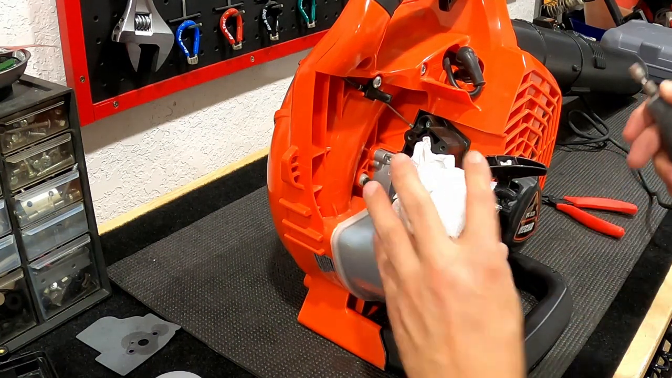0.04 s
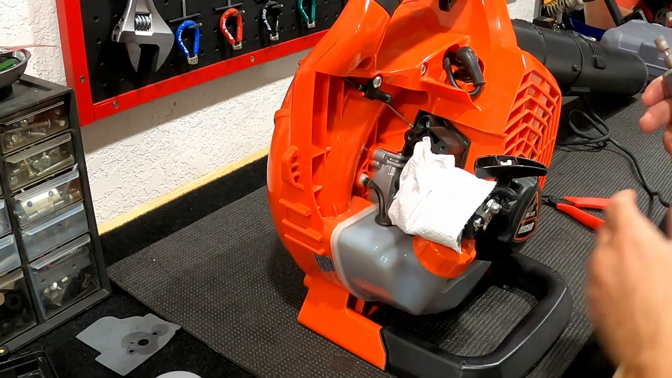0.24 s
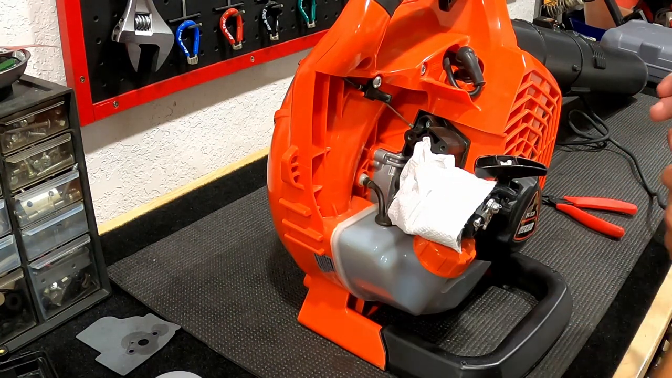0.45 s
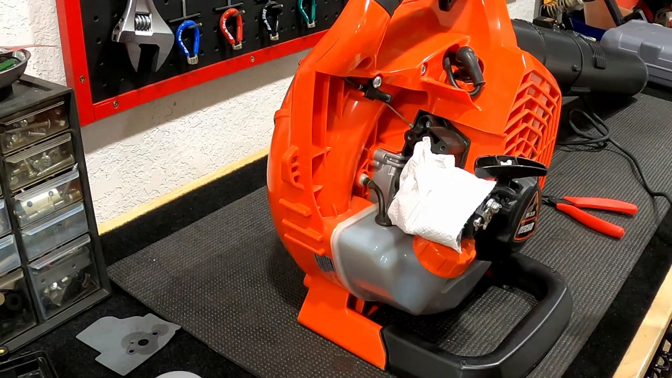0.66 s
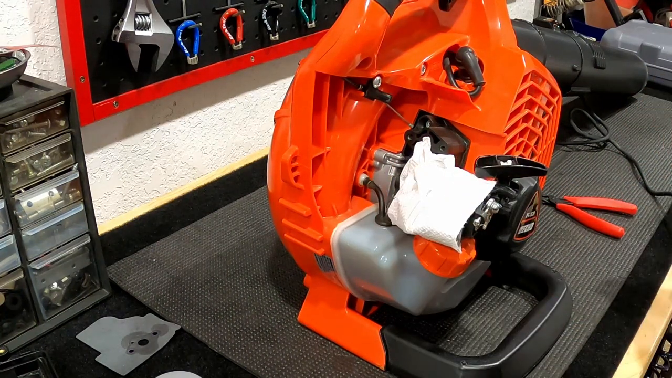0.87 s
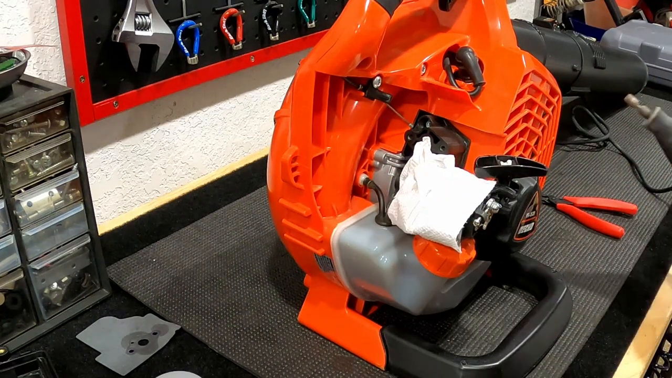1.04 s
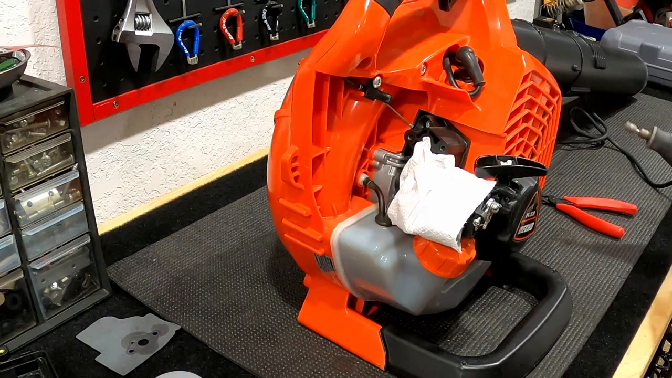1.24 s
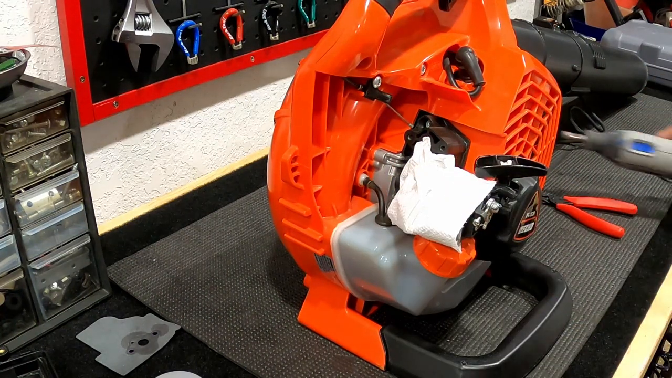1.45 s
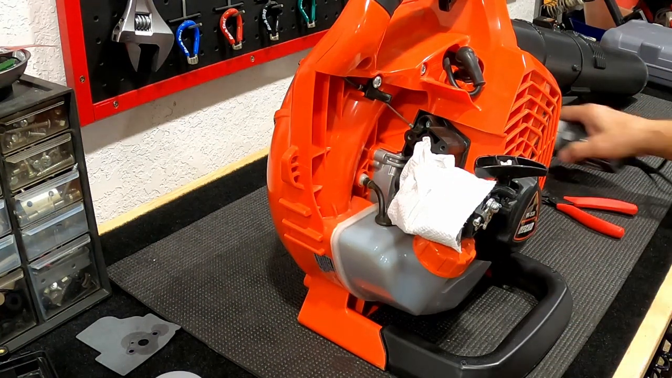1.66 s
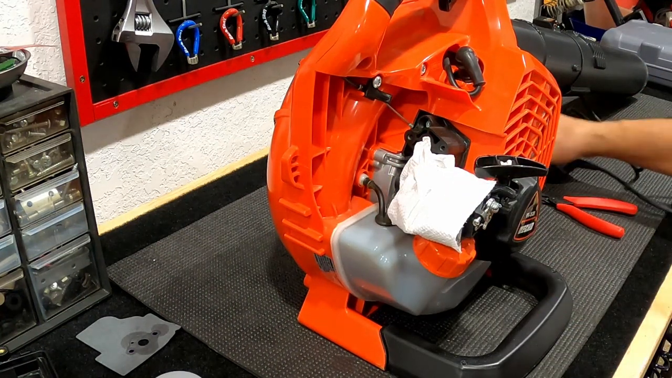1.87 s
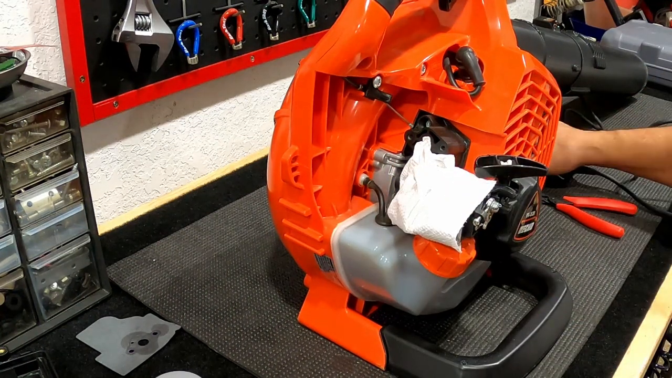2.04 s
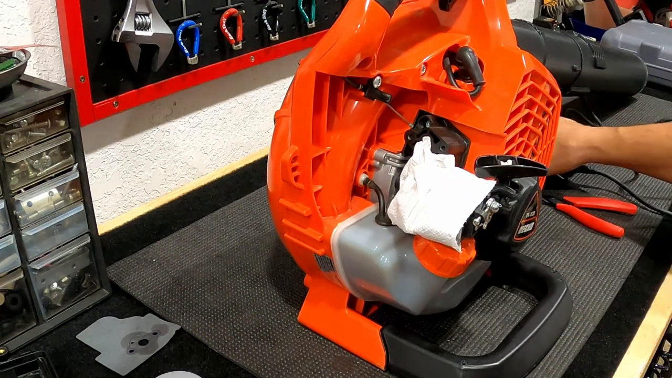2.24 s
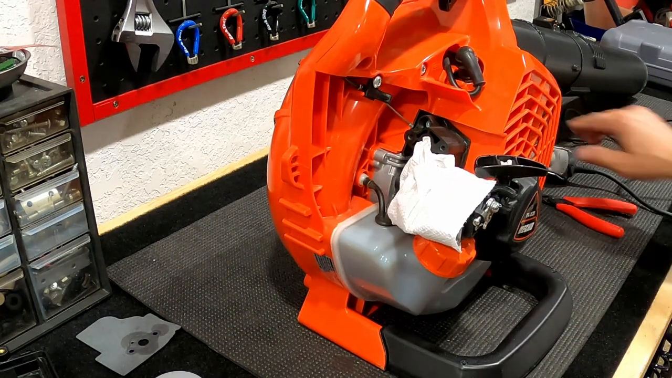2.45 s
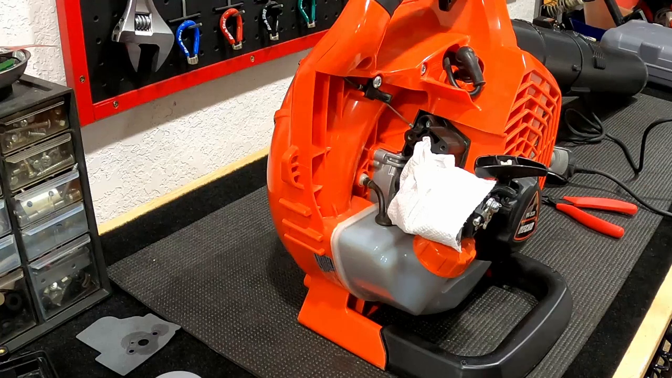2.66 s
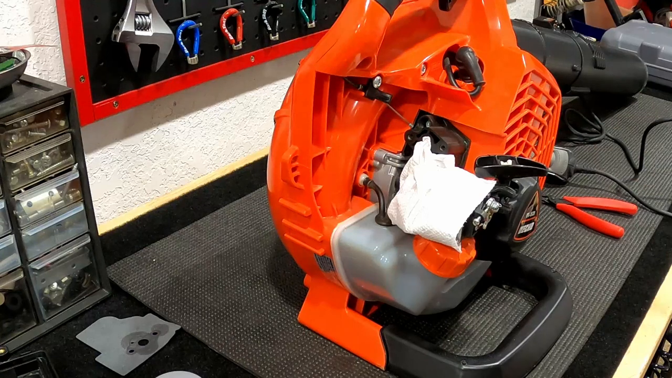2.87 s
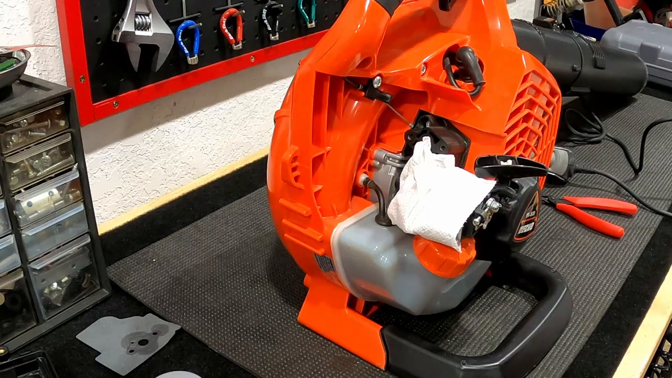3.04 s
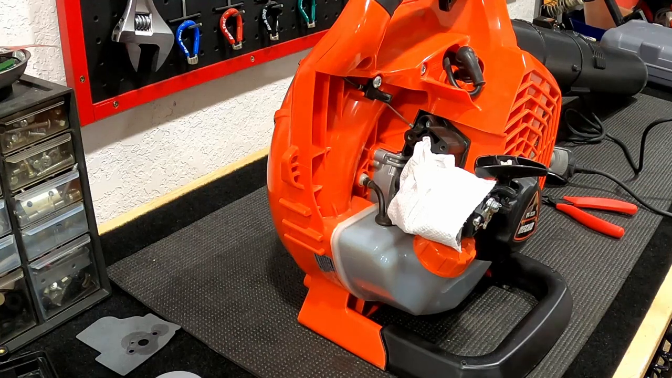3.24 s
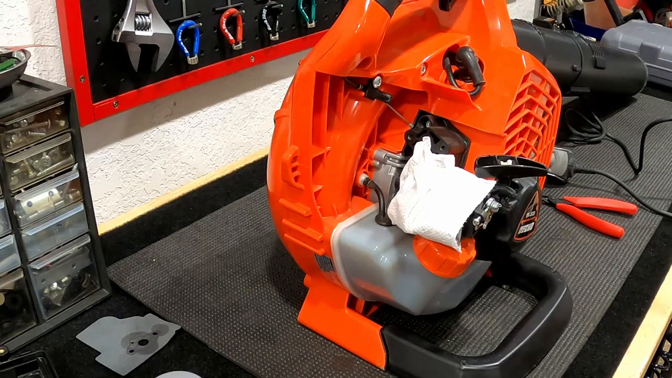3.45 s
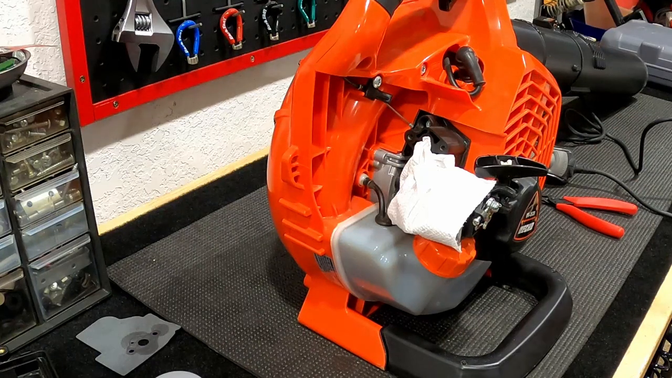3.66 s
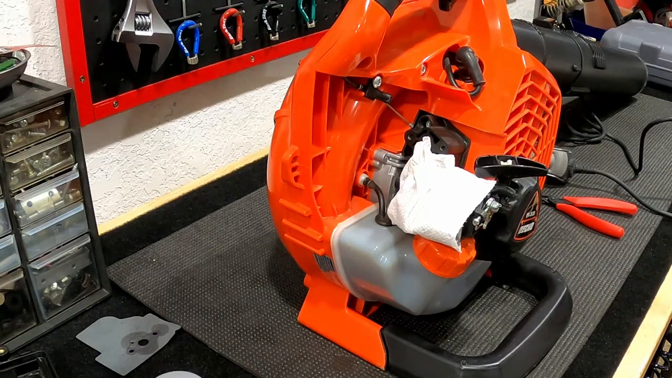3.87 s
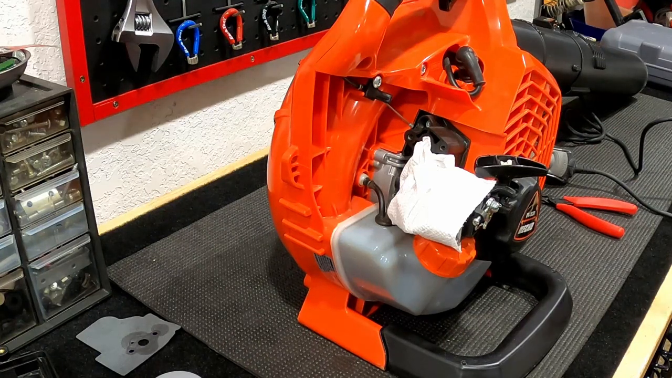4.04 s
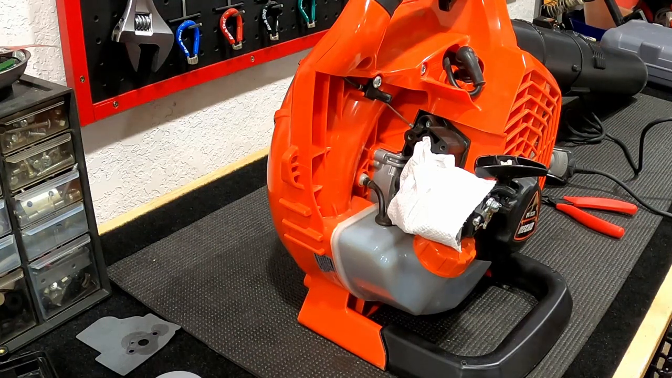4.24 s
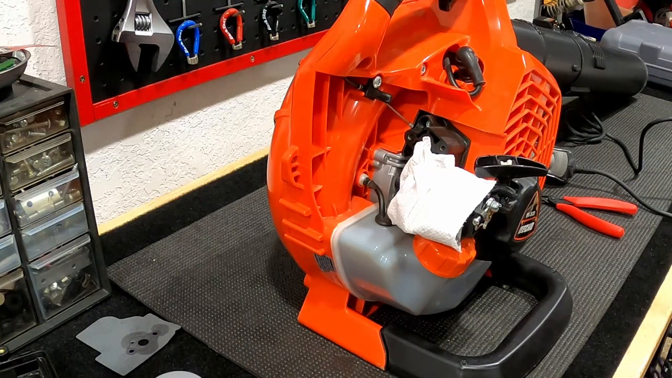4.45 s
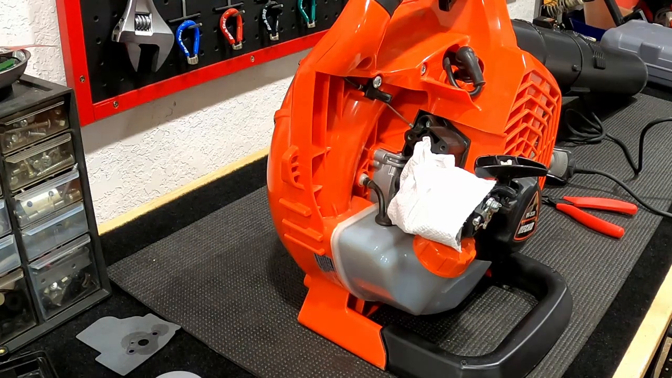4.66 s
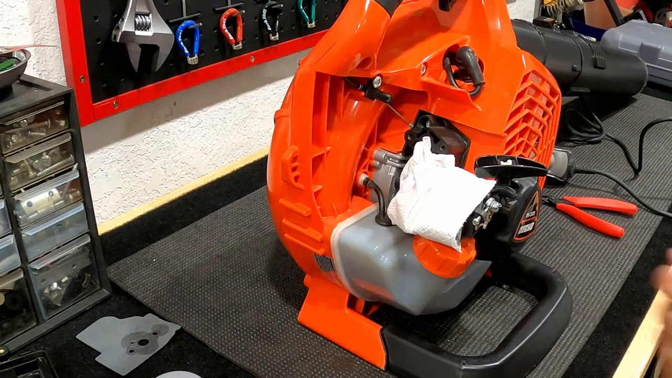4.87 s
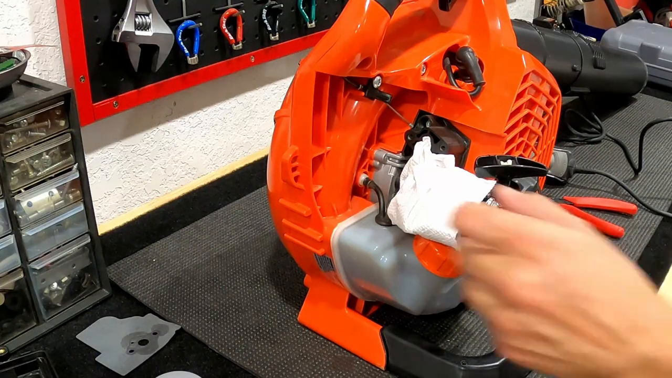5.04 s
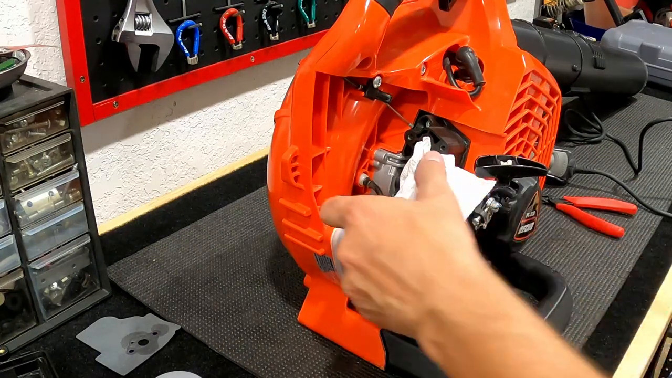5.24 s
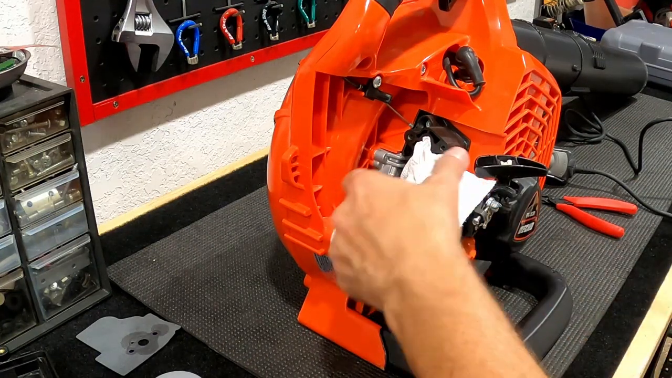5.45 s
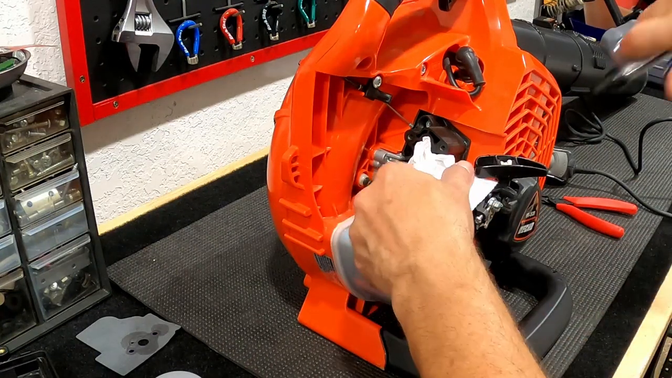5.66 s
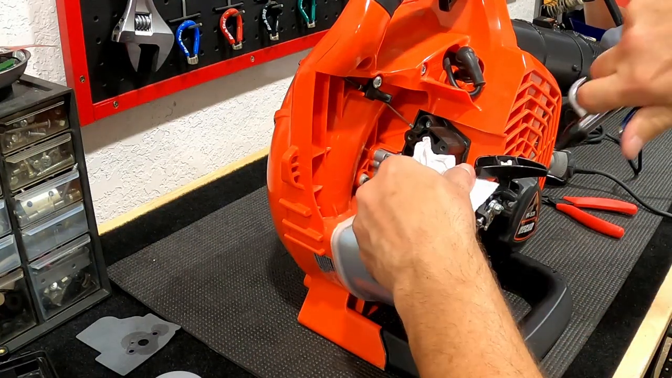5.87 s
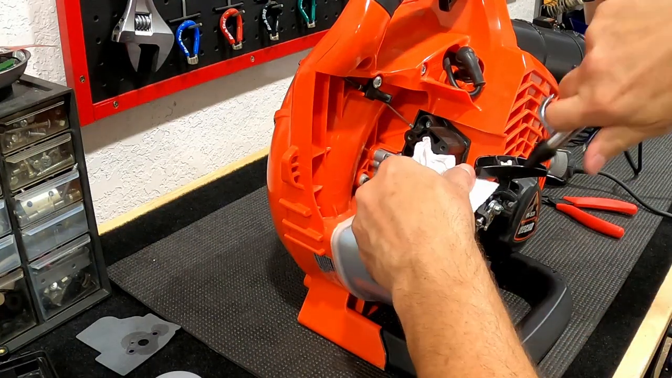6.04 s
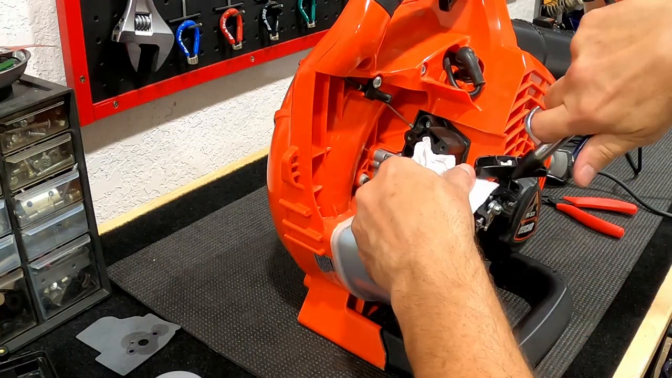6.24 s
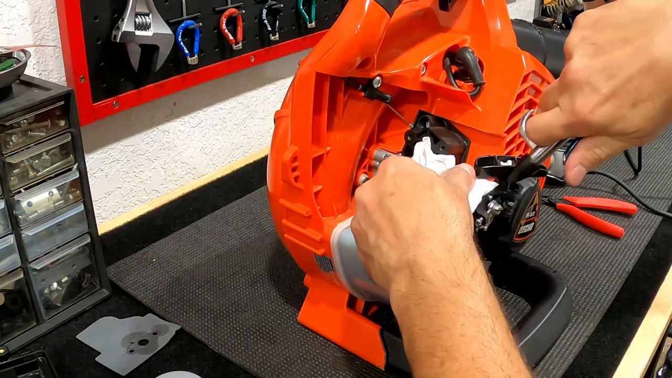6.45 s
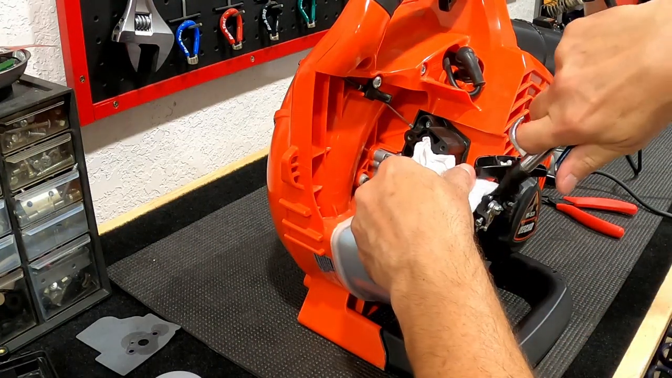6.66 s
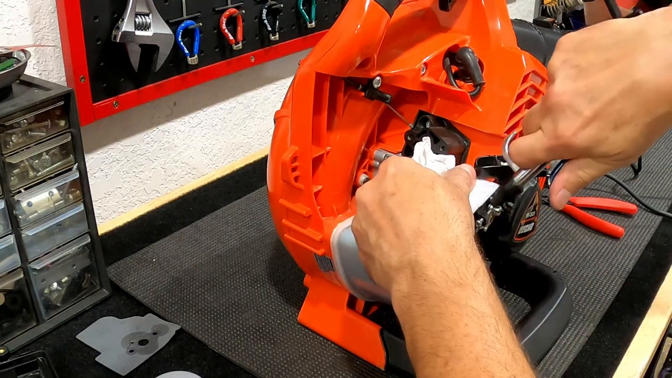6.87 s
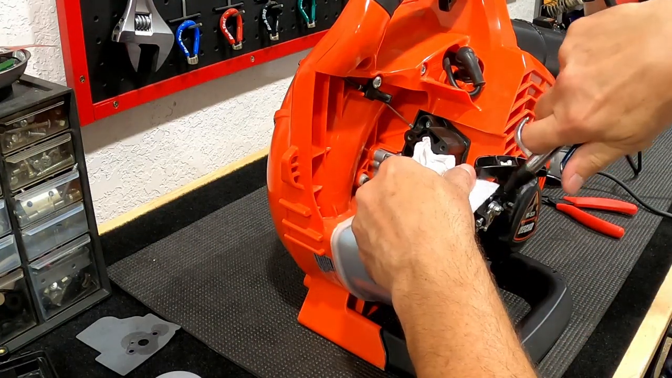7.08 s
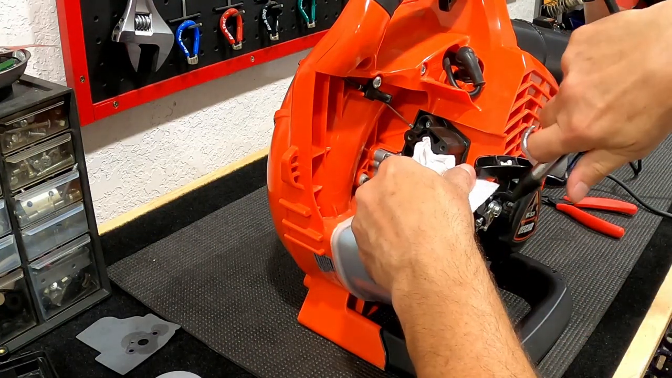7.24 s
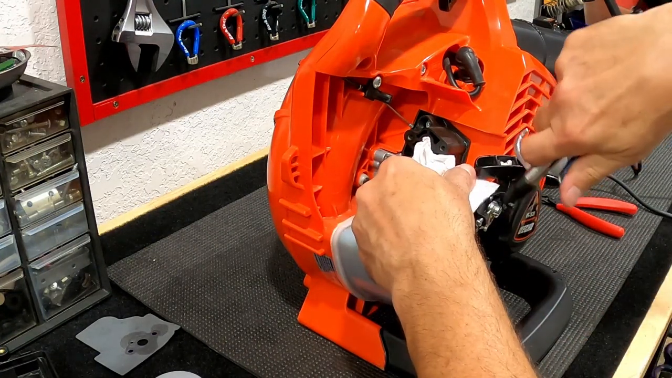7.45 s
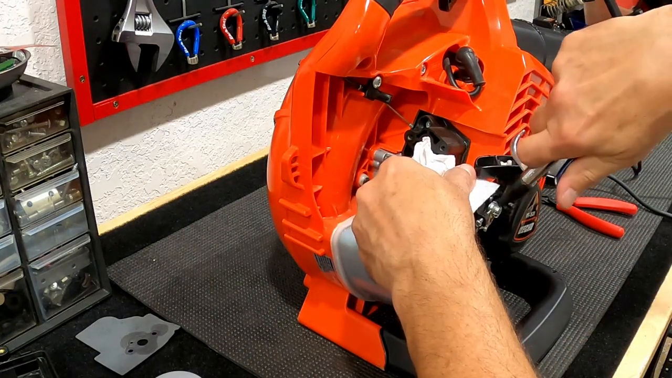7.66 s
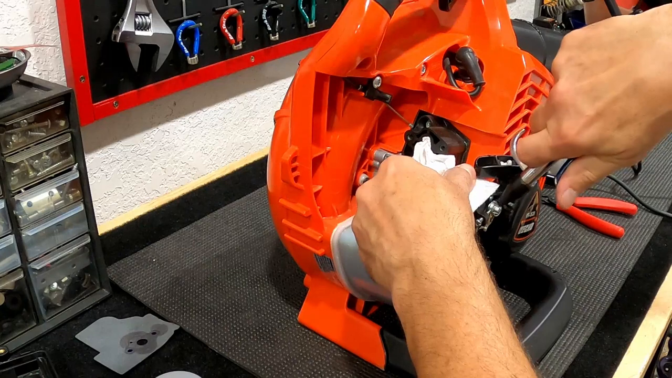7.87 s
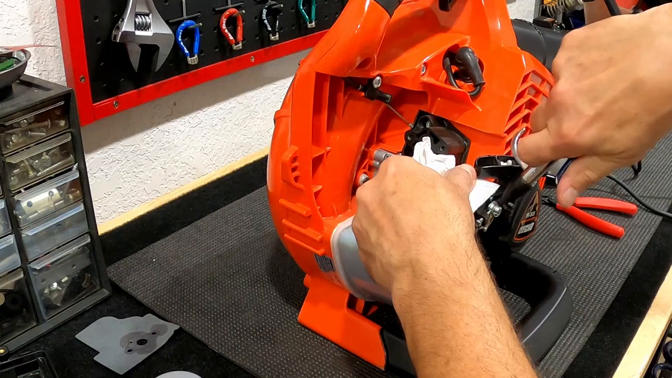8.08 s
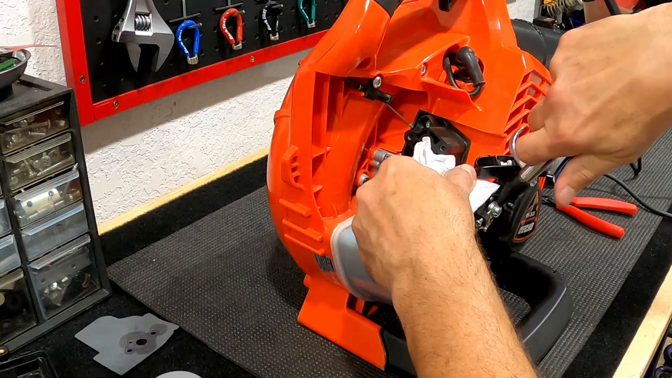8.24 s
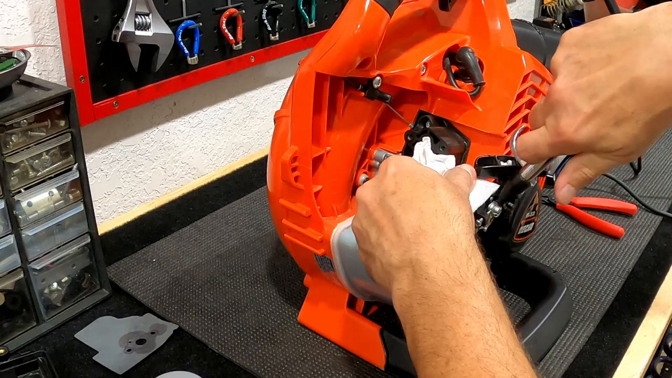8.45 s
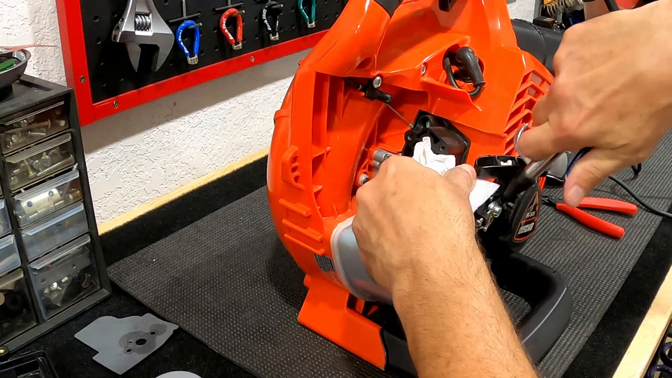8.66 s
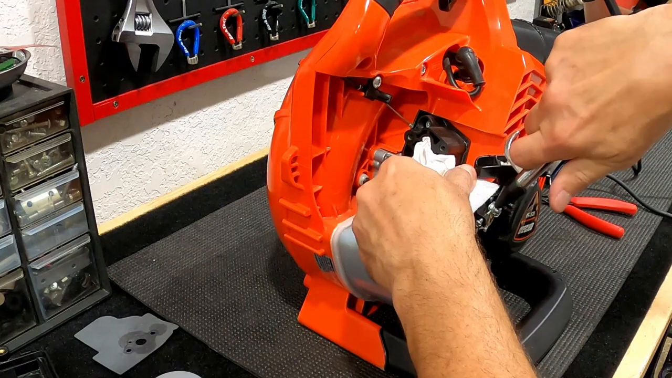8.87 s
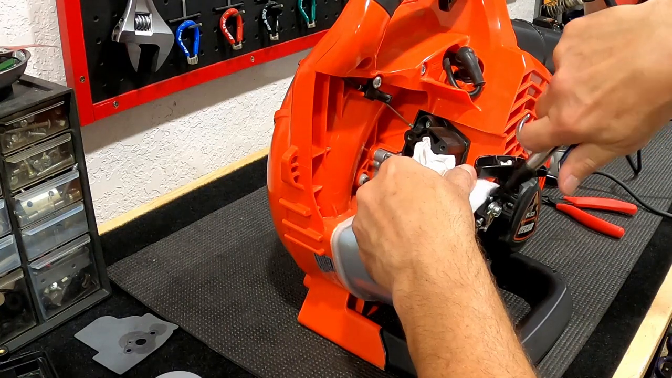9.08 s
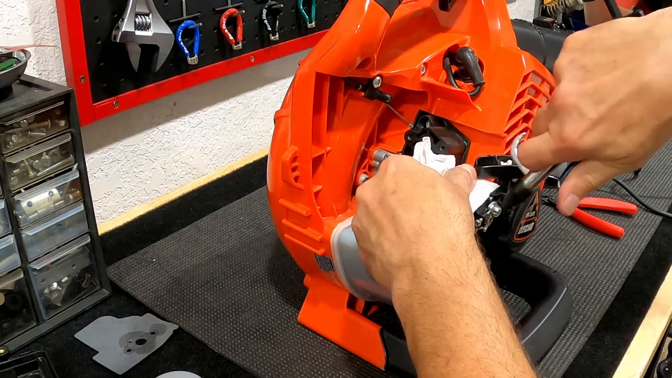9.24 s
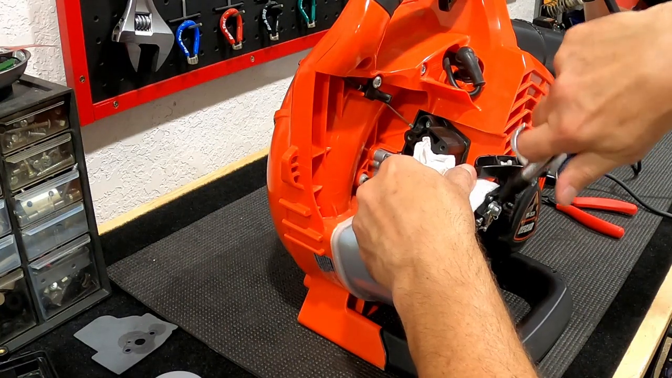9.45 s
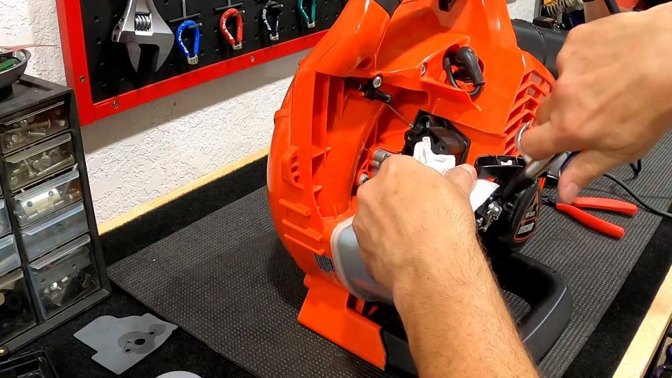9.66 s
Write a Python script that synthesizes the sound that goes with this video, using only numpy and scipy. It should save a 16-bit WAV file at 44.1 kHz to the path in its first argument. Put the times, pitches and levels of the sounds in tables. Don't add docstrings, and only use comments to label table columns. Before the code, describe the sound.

A rotary tool whines at high speed close by, buzzy and bright, swaying in level as it is moved. At about 0.8 s a faint click cuts the power, and the whine glides steadily downward with brushes and fan rushing; dull thumps at 1.8-2.05 s mark it being laid down. It grows faint from 2.6 s and stops near 3.5 s. A small knock follows at 3.6 s, then a sharp, dense clatter of metal parts on a far shelf at 4.1-4.3 s, ringing briefly in the room. Soft hose scrapes continue, with a bump and coupling rattle around 5.8-6 s. Compressed air blasts at 6.17-6.3 s, bright and spitting, then a long pull from 6.45 to 8.64 s, rough and fluttering over fins, with low gusts and breathy whistles. After a short gap, another hiss runs from 8.87 s to the end, now nearly mono.

```python
import sys
import numpy as np
from scipy import signal
from scipy.fft import rfft, irfft, next_fast_len
from scipy.io import wavfile
from scipy.ndimage import uniform_filter1d, map_coordinates

SR = 44100
rng = np.random.default_rng(int(sys.argv[2]) if len(sys.argv) > 2 else 0)


def gain_from_db(level_db):
    decades = np.asarray(level_db, float) / 20
    return 10 ** decades


def to_wav(sig):
    pcm = np.clip(np.atleast_2d(sig), -1, 1) * 32767
    pcm = np.round(pcm).astype(np.int16)
    wavfile.write(sys.argv[1], SR, pcm.T)


N = 428211

# [multiple of shaft speed, level/dB, flicker/dB]
ORDERS = [(1, 27, 1), (3, -1, 2), (4, -13, 4), (6, -9, 4), (6.9, -3, 5), (8, -8, 5), (9.1, -1, 5),
          (10, -10, 4), (10.9, 4, 3), (12.8, -10, 5), (13.2, -4, 6), (15, -6, 6), (16, -5, 4),
          (17.1, -11, 6), (19.1, -8, 7), (21, -7, 6), (23, -12, 5), (25, -10, 5), (26.8, -13, 5),
          (29, -13, 5), (30, -13, 5), (31, -13, 5), (33, -12, 5), (37, -14, 5), (41, -14, 5), (47, -13, 5),
          (73, -9, 5), (79, -8, 5), (83, -8, 5), (32, -3, 4), (40, -5, 4), (48, -1, 4), (52, -12, 5),
          (55, -10, 5), (56, -3, 4), (63, -9, 5), (64, 0, 4), (71, -8, 5), (72, -3, 4), (80, -1, 4),
          (87, -7, 5), (88, 0, 5), (96, -2, 5), (104, 0, 5), (112, -2, 5), (120, -2, 5)]
# [multiple of shaft speed, ripple beats, level facing away/dB, level turned round/dB]
POWERED_TONES = [(8, 0, -35, -34), (8, 1, -38, -34), (8, 2, -47, -50), (8, 3, -40, -42), (8, 4, -50, -46),
                 (8, -1, -43, -47), (8, -2, -55, -52), (5, 2, -50, -48), (10, 0, -37, -46),
                 (10, 2, -48, -48), (13, 0, -50, -46), (15, 0, -43, -53), (16, 0, -54, -50),
                 (4.88, 0, -46, -42)]
# [multiple of shaft speed, level at free speed/dB,
# loss per tenfold slowing/dB, unsteadiness/1]
LEADING_TONES = [
    (5, -31, 21, 1.4),
    (12, -37, 42, 1.3),
    (24, -35, 48, 1.3),
]
# [f/Hz, level/dB]
SHELL_COLOUR = [(200, -50), (255, -34), (295, -25), (500, -20), (650, -19), (780, -15), (900, 3),
                (1150, -10), (1300, -6), (1500, 1), (1800, -8), (2050, -5), (2300, -12), (2600, -4),
                (2800, 5), (3020, -2), (3300, -7), (3550, -4), (3900, -2), (4350, -3), (4700, -8),
                (5400, -2), (6300, -11), (7200, -9), (7900, -12), (9000, -16), (14000, -26)]
# [f/Hz, level/dB]
BRUSH_COLOUR = [(120, -50), (250, -50), (550, -22.5), (734, -26), (929, -3), (1170, -9), (1490, -3),
                (2210, -11.5), (2900, -7.5), (5260, -10), (12300, -18.5), (15000, -36)]
# [f/Hz, level/dB]
FAN_COLOUR = [(150, -63), (300, -21.5), (600, -21), (900, -15.5), (1500, -5), (2000, -6.5), (2800, -3.5),
              (4000, -7.5), (5850, -11), (7960, -30), (15000, -36)]
# [t/s, level/dB]
TOOL_NEARNESS = [(0, 5), (.25, -1.5), (.45, 2), (.62, 5), (.84, 6), (.865, -2.5), (.95, 2.5), (1.1, 2.5),
                 (1.35, 2), (1.5, 3), (1.75, 2), (2.0, 5.5), (2.6, 4), (3.3, -19)]
# [t/s, left minus right/dB]
TOOL_PAN = [(0, -4.5), (.8, -2), (1.5, -1.5), (9.7, 1)]
# [f/Hz, level/dB]
HUM_TONES = [(53.8, -59), (161.5, -63), (240.2, -50.5), (355, -68), (2972, -83), (3973, -83), (4420, -84),
             (5297, -82)]
# [f/Hz, level/dB]
FLOOR_COLOUR = [(12, -50), (22, -12), (58, -3.5), (170, -9), (240, -17), (350, -13.5), (508, -24.5),
                (1560, -36.5), (5360, -34.5), (9000, -45.5), (14000, -91)]
# [t/s, peak level/dB, click over thud/dB]
THUDS = [
    (0.788, -48, 6),
    (1.811, -22.5, -26),
    (1.998, -19.5, -17),
    (2.039, -23, -10),
    (5.801, -26.5, -10),
]
# [t/s, peak level/dB]
PUSHES = [(1.81, -40), (2.021, -26), (3.63, -41), (5.831, -33), (7.337, -22)]
# [t/s, peak level/dB, bright part over dull/dB]
KNOCKS = [(3.619, -37, -15), (3.929, -47.5, -21), (4.013, -38.5, -9), (4.048, -40, -5), (5.038, -50, -10),
          (5.074, -60, -14), (5.493, -49, -26), (5.66, -46, -16), (5.836, -44, -24)]
# [peak t/s, rise/s, time to fade 60 dB/s, level/dB, bright part over dull/dB]
SCRAPES = [(3.63, .01, 0.44, -57, -16), (3.93, 0.17, 0.13, -67, 3), (4.09, 0.085, 0.46, -38.5, -16),
           (4.03, .015, 0.38, -48.5, -12), (4.6, 0.17, 1.5, -58.5, -23), (5.076, .005, 0.45, -53.5, -10),
           (5.49, 0.14, 0.94, -55, -7), (5.77, 0.11, 0.27, -59, -3)]
# [t/s, level/dB, bright part over dull/dB]
CLATTER = [(4.097, -16, -0.5), (4.103, -21, -15), (4.109, -17, -25), (4.13, -19, -22), (4.142, -20.5, -10),
           (4.148, -22, 3.5), (4.157, -20.5, 3), (4.165, -17.5, -3.5), (4.178, -18, -11),
           (4.19, -22.5, -23), (4.202, -27, -19), (4.235, -26, -19), (4.255, -25.5, -17.5),
           (4.28, -45, -10), (4.311, -44, -4), (4.353, -46, -1)]
# [struck t/s, f/Hz, level/dB, time to fade 60 dB/s]
RINGING_METAL = [(4.1, 1513, -63, 6), (4.1, 1087, -66, 4), (4.1, 1095, -35, .3), (4.1, 1370, -33, .3),
                 (4.1, 1890, -38, .25), (4.1, 4520, -44, .25), (4.1, 657, -34, .4), (4.165, 1367, -29, .22),
                 (4.2, 1082, -35, .35), (4.152, 5276, -44, .3), (4.152, 1884, -36, .35),
                 (4.1, 2500, -36, .15), (5.797, 2300, -40, .025), (5.797, 750, -40, .03),
                 (5.811, 2250, -41, .03), (5.811, 850, -46, .025), (5.84, 1550, -46, .05),
                 (3.62, 1190, -43, .045), (3.62, 1910, -46, .035), (3.62, 1500, -47, .035),
                 (3.62, 2610, -56, .03)]
# [peak t/s, rise/s, time to fade 60 dB/s, level/dB]
COUPLING_RATTLE = [(5.848, .014, .25, -44), (5.89, .04, .4, -49), (5.96, .03, .25, -53)]
# [f/Hz, level/dB]
SHELF_COLOUR = [(70, -42), (130, -16.5), (260, -5), (450, -10), (650, -6), (850, -10.5), (1100, 1),
                (1370, -3), (1550, -4.5), (1900, -5.5), (2550, -9), (2950, -14.5), (3600, -13.5),
                (4500, -13), (6000, -38), (9900, -100)]
GRIT_COLOUR = [(2000, -30), (3500, -6), (5000, -1), (6300, -4), (7500, -13), (9000, -9), (12000, -21),
               (15500, -38)]
HOSE_COLOUR = [(150, -40), (600, -18), (1000, -3), (1400, 0), (2300, -4), (3500, -12), (5000, -28),
               (9000, -80)]
COUPLING_COLOUR = [(400, -22), (600, -11), (1000, -2), (1600, 1), (2400, 0), (3200, -4), (4500, -12),
                   (8000, -23), (14000, -70)]
TICK_COLOUR = [(4000, -30), (6200, -3), (8500, 0), (11000, -8), (15500, -40)]
# [open t/s, shut t/s, level/dB]
TRIGGER_PULLS = [
    (6.169, 6.316, -23.5),
    (6.36, 6.452, -44.5),
    (6.442, 8.641, -24),
    (8.865, 9.8, -23),
]
# [t/s, depth/1: 0 outside, 1 deep]
NOZZLE_DEPTH = [(6.17, 0.12), (6.65, 0.12), (6.8, 0.58), (7.1, 0.88), (7.3, 0.59), (7.5, 0.99), (8.6, 1.14),
                (9.0, 1.09), (9.2, 0.85), (9.7, 0.65)]
# [t/s, hiss level/dB, fizz level/dB]
RIBS = [(6.2, -1.5, 6), (6.25, -4, -3), (6.6, -3.5, 2), (6.82, -1.5, -2.5), (7.15, 1.5, -0.5),
        (7.32, -2, 3), (7.38, -0.5, -1.5), (7.499, 2, 1.5), (7.57, -3.5, -3.5), (7.68, 2.5, 0),
        (7.77, -1.5, -1.5), (7.89, 0.5, 2.5), (7.95, -2, -4), (8.0, 3, 2), (8.06, -1, -2.5),
        (8.13, -1, 0.5), (8.25, 1, 2.5), (8.34, -1.5, -1), (8.46, -0.5, -0.5), (8.58, -0.5, 4.5),
        (8.959, 0.5, 1.5), (9.1, 1.5, 3), (9.19, -1, -1), (9.25, -1, 2), (9.36, 0, 0), (9.41, -2.5, -1),
        (9.62, 0, -3)]
# [t/s, level/dB]
GUSTS = [(6.2, 7.5), (6.245, 1.5), (6.5, 7), (6.56, 4.5), (6.62, 9), (6.97, 4), (7.33, 20.5), (7.67, 16),
         (7.86, 19), (7.95, -7), (8.38, -2), (8.52, 1), (8.63, -5), (9.0, -7), (9.17, 6), (9.35, -5),
         (9.42, 13)]
# [t/s, level/dB]
WHISTLES = [(7.3, -37), (7.345, -36), (7.81, -35), (7.84, -37), (7.87, -35), (7.92, -34), (7.96, -37),
            (8.1, -32), (8.165, -33), (8.325, -35), (8.365, -32), (8.51, -32), (9.65, -35)]
# [f/Hz, level/dB]
HISS_COLOUR = [(590, -52), (1000, -19), (1400, -9), (1980, -9), (2250, -1.5), (2700, -3), (3420, 2),
               (3820, -1.5), (4600, 1.5), (5220, -9), (7500, -17.5), (9750, -16.5), (16500, -120)]
FIZZ_COLOUR = [(3240, -18.5), (5500, -2), (6060, -1), (8050, -4.5), (9110, 1), (11100, -9), (12100, -10.5),
               (14500, -24.5), (15300, -36), (15700, -47)]
ROAR_COLOUR = [(120, -12), (200, -8), (235, -17.5), (783, -12), (1030, -13), (2200, -6), (2860, -12.5),
               (4840, -120)]
SPIT_COLOUR = [(8000, -40), (11000, -7), (13000, 0), (15500, -4), (15900, -30)]
EDGE_COLOUR = [(9000, -40), (10300, -9), (11300, -10), (12000, 0), (12900, -9), (15000, -60)]
BUFFET_COLOUR = [(8.8, -35), (15, -3), (38, 0.5), (113, -1), (210, -4.5), (463, -17), (1200, -22),
                 (1560, -22), (2640, -120)]
# [f/Hz, time to fade 60 dB/s]
SHOP_FADE = [(150, 0.96), (1000, 0.65), (4000, 0.65), (12000, 0.49)]
# [f/Hz, likeness/1]
LIKENESS = [(80, 0.95), (300, 0.9), (1000, 0.75), (4000, 0.088), (8000, 0.12)]
# [f/Hz, left minus right/dB]
PORT_TILT = [(100, -2.5), (300, 0), (3000, 0.5), (6000, -2.5), (10000, -1.5), (13500, -5)]
# [t/s, level/dB]
RIGHT_SHARE = [(6.2, 0), (6.45, -4.5), (6.8, -14.5), (7.1, -17), (9.7, -19)]
RIGHT_BASS = [(6.2, 2), (6.68, -3.5), (6.9, -10), (7.1, -9.5), (9.7, -35)]

SWITCH_OFF, STANDSTILL = 0.806, 3.48
FREE_SPEED = 302
HELD_DB = -5
FLOOR_PAN = 0.78


def unit(x):
    return x / np.sqrt(np.mean(x ** 2) + 1e-20)


def along(points, hz):
    f, v = np.transpose(points)
    return np.interp(np.log(hz + 1), np.log(f + 1), v)


def clock():
    return np.arange(N) / SR


def curves(rows):
    s, *cols = np.transpose(rows)
    return [np.interp(clock(), s, c) for c in cols]


def wobble(rate):
    knots = rng.standard_normal(int(N * rate / SR) + 4)
    return map_coordinates(knots, [np.arange(N) * rate / SR])


def filtered(x, response):
    m = next_fast_len(N + SR // 2)
    return irfft(rfft(x, m) * response(np.fft.rfftfreq(m, 1 / SR)), m)[..., :N]


def coloured(x, spectrum):
    return filtered(x, lambda hz: gain_from_db(along(spectrum, hz)))


def struck(x, spectrum):
    power = gain_from_db(2 * along(spectrum, np.linspace(0, SR / 2, num=2000)))
    return coloured(x, spectrum) / np.sqrt(np.mean(power))


def rush(spectrum, patchy_db, size=(6, 12)):
    z = signal.stft(rng.standard_normal(N), nperseg=512)[2]
    field = uniform_filter1d(rng.standard_normal(z.shape), size[0], 0)
    field = uniform_filter1d(field, size[1], 1)
    noise = signal.istft(z * gain_from_db(patchy_db * unit(field)), nperseg=512)[1][:N]
    return unit(coloured(noise, spectrum))


def bursts(events, t60, rise=0.00027):
    x, t = np.zeros(N + SR), np.arange(SR // 8) / SR
    for s, db in events:
        puff = gain_from_db(db - 60 * t / t60) * (1 - np.exp(-t / rise))
        x[round(s * SR):][:len(t)] += puff * rng.standard_normal(len(t))
    return x[:N]


def strokes(rows):
    t, total = clock(), 0
    for s, rise, t60, db in rows:
        fade = gain_from_db(db - 60 * np.maximum(t - s, 0) / t60)
        total = total + fade * np.clip((t - s) / rise + 1, 0, 1) ** 2
    return total


def swells(events, width):
    return sum(db * np.exp(-.5 * ((clock() - s) / width) ** 2) for s, db in events)


def tone(phase, db):
    return np.sqrt(2) * gain_from_db(db) * np.sin(phase + rng.uniform(0, 2 * np.pi))


def panned(x, db):
    return np.array([x * gain_from_db(db / 2), x * gain_from_db(-db / 2)])


def shaft():
    warming, warm_s = 9, .3
    dry_drag, air_drag = 91.77, .12
    coast_from, snatch, snatch_s = 294.1, 8, .055
    bind_s, bind = 2.45, 8
    t, floor = clock(), dry_drag / air_drag
    since = np.maximum(t - SWITCH_OFF, 0)
    coast = (coast_from + floor) * np.exp(-air_drag * since) - floor
    coast = coast + snatch * np.exp(-since / snatch_s)
    coast = coast - bind * np.maximum(t - bind_s, 0) ** 2
    powered = FREE_SPEED - warming * np.exp(-t / warm_s)
    return np.maximum(np.minimum(powered, coast), 8)


def tool():
    speed, (near_db,), t = shaft(), curves(TOOL_NEARNESS), clock()
    slowed = np.log10(speed / FREE_SPEED)
    coasting = np.clip((t - SWITCH_OFF) / .05, 0, 1)
    held_db = HELD_DB * (1 - coasting)
    angle = 2 * np.pi * np.cumsum(speed * (1 + .001 * wobble(40))) / SR

    comb_db, per_octave = 1.0, 30
    peaks = rng.standard_normal(10 * per_octave)

    def lit(hz):
        place = per_octave * np.log2(hz / 30 + 1)
        return comb_db * coasting * np.clip(map_coordinates(peaks, [place]), -2.5, .7)

    whine = 0
    for k, db, flicker in ORDERS:
        level = db + .45 * flicker * wobble(13) + (lit(k * speed) + held_db) * (k > 1)
        whine = whine + tone(k * angle, level) * (k * speed < 15000)
    whine = whine * gain_from_db(-43 + 14 * slowed)
    for k, db, law, loose in LEADING_TONES:
        flutter = (1.2 + .8 * coasting) * wobble(30)
        level = db + law * slowed + near_db + loose * flutter
        level = level + 1.08 * lit(k * speed) + held_db * (k > 5)
        whine = whine + tone(k * angle, level)
    stall = 58
    tones = coloured(whine / (1 + (stall / speed) ** 4), SHELL_COLOUR)

    ripple, turn_s, ripple_hz = 0, (.38, .55), 120
    for k, beats, *db in POWERED_TONES:
        phase = k * angle + 2 * np.pi * beats * ripple_hz * t
        ripple = ripple + tone(phase, np.interp(t, turn_s, db) + 1.5 * wobble(6))
    current = np.clip((SWITCH_OFF - .015 - t) / 0.054, 0, 1)
    tones = tones + gain_from_db(0.86 * near_db - 2.0) * ripple * current

    rubbing = 1 + 0.36 * np.cos(angle)
    brushes = gain_from_db(-41 + 12.4 * slowed + 0.19 * near_db) * rubbing * rush(BRUSH_COLOUR, patchy_db=2)
    fan = gain_from_db(-33.5 + 73 * slowed + 0.09 * near_db) * rush(FAN_COLOUR, patchy_db=2.0)
    running = np.clip((STANDSTILL - t) / 0.2, 0, 1)
    return running * tones, running * (brushes + fan)


def mains_hum():
    total = 0
    for hz, db in HUM_TONES:
        sway_db = (2.5 if hz > 1000 else .8) * wobble(4)
        total = total + np.sqrt(2) * gain_from_db(db + sway_db) * np.sin(2 * np.pi * hz * clock())
    return total


def background():
    return gain_from_db(-51.5) * np.array([rush(FLOOR_COLOUR, patchy_db=3.5), rush(FLOOR_COLOUR, patchy_db=0.5)])


def thuds():
    thud_colour = [(60, -6.0), (150, -13), (500, -17.0), (1000, -10.0), (9000, -82.0)]  # f/Hz, level/dB
    thud = struck(bursts([(s, db - 7.0) for s, db, _ in THUDS], 0.014), thud_colour)
    click = struck(bursts([(s, db + up) for s, db, up in THUDS], 0.015), HOSE_COLOUR)
    return thud + click


def ringing_metal():
    total = 0
    for s, hz, db, t60 in RINGING_METAL:
        since = np.maximum(clock() - s, 0)
        level = gain_from_db(db - 60 * since / t60 + 1.5 * wobble(8)) * (1 - np.exp(-since / .0015))
        total = total + level * np.sin(2 * np.pi * hz * since + .8 * wobble(30))
    return total


def handling():
    grains = gain_from_db(-3.5 + 2.1 * wobble(90))
    dull = grains * strokes([row[:4] for row in SCRAPES]) * rush(HOSE_COLOUR, patchy_db=2)
    knocks = [(s, db - 2.0) for s, db, _ in KNOCKS]
    dull = dull + struck(bursts(knocks, 0.036, rise=.0015), HOSE_COLOUR)
    rattle = grains * gain_from_db(-1.5) * strokes(COUPLING_RATTLE) * rush(COUPLING_COLOUR, patchy_db=1.5)
    hits = [(s, db) for s, db, _ in CLATTER]
    clatter = struck(bursts(hits, 0.096, rise=0.0022), SHELF_COLOUR)
    tick = struck(bursts([(4.366, -37)], 0.0067), TICK_COLOUR)
    bright_scrapes = [(s, rise, t60, db + up) for s, rise, t60, db, up in SCRAPES]
    bright = grains * strokes(bright_scrapes) * rush(GRIT_COLOUR, patchy_db=2.5)
    bright_hits = [(s, db + up - 0.5) for s, db, up in KNOCKS + CLATTER]
    bright = bright + struck(bursts(bright_hits, 0.042, rise=0.0016), GRIT_COLOUR)
    return dull + rattle + clatter + tick + bright + thuds() + ringing_metal()


def pushes():
    total = 0
    for s, db in PUSHES:
        u = (clock() - s) / 0.0033
        total = total + gain_from_db(db) * (u * u - 1) * np.exp(-u * u / 2)
    return total


def gate(rise, fall):
    t, flow = clock(), 0
    for on, off, db in TRIGGER_PULLS:
        surge_db = 2 * np.exp(-np.abs(t - on) / 0.008)
        opening = np.clip(np.minimum((t - on) / rise + 1, (off - t) / fall + 1), 0, 1)
        flow = flow + gain_from_db(db + surge_db) * opening ** 2
    return flow


def whistles():
    swell = sum(gain_from_db(db) * np.exp(-.5 * ((clock() - s) / 0.011) ** 2) for s, db in WHISTLES)
    return swell * rush(EDGE_COLOUR, patchy_db=1.5)


def jet():
    depth, = curves(NOZZLE_DEPTH)
    over_hiss = [(-0.5, -2), (-21.5, -9), (-3.5, -30)]
    fizz_db, roar_db, buffet_db = (out + depth * (deep - out) for out, deep in over_hiss)
    hiss_rib = swells([(s, hiss) for s, hiss, _ in RIBS], 0.04)
    fizz_rib = swells([(s, fizz) for s, _, fizz in RIBS], 0.04)
    flow = gate(0.012, 0.018) + 0.032 * gate(0.051, .03)
    eddies = 0.31 * wobble(20) + 1.1 * wobble(45) + 0.83 * wobble(400)
    hiss = gain_from_db(hiss_rib) * rush(HISS_COLOUR, 1.6, size=(9, 14))
    fizz = gain_from_db(fizz_db + fizz_rib) * rush(FIZZ_COLOUR, 1.4, size=(20, 8))
    roar = gain_from_db(roar_db + 0.5 * hiss_rib + 0.3 * wobble(13)) * rush(ROAR_COLOUR, 1.3)
    fresh = np.exp(-(np.abs(clock() - TRIGGER_PULLS[0][0]) / 0.1) ** 2)
    spit = gain_from_db(-17) * fresh * rush(SPIT_COLOUR, 1.2)
    lumps = flow * gain_from_db(buffet_db + swells(GUSTS, 0.016) + 3.3 * wobble(30))
    return flow * gain_from_db(eddies) * (hiss + fizz + roar + spit) + whistles(), lumps


def buffeting(lumps):
    share = gain_from_db(curves(RIGHT_BASS)[0])
    left = gain_from_db(-22 * share + 1.0) * rush(BUFFET_COLOUR, 1.8)
    right = gain_from_db(7.5) / share ** 0.039 * rush(BUFFET_COLOUR, 0.58)
    return lumps * np.array([left, right])


def shop(x):
    hz, t, z = signal.stft(rng.standard_normal((2, int(.8 * SR))), SR, nperseg=256)
    fading = gain_from_db(-60 * t / along(SHOP_FADE, hz)[:, None])
    tail = signal.istft(z * fading, SR, nperseg=256)[1]
    late = np.pad(x, (300, 0))[None]
    return signal.fftconvolve(late, tail / np.linalg.norm(tail[0]), axes=1)[:, :N]


def ports(direct, diffuse):
    def turn(hz):
        return np.arccos(np.clip(along(LIKENESS, hz), -1, 1)) / 2

    def lag(hz):
        return 1.95 / np.sqrt(1 + (hz / 9200) ** 2)

    def hole(hz, k):
        return gain_from_db(k * along(PORT_TILT, hz)) * np.exp(-2j * np.pi * k * hz * lag(hz) / SR)

    mid, side = filtered(diffuse, lambda hz: np.array([np.cos(turn(hz)), np.sin(turn(hz))]))
    heard = direct + np.array([mid + side, mid - side])
    return filtered(heard, lambda hz: np.array([hole(hz, .5), hole(hz, -.5)]))


def scene():
    tones, motor = tool()
    hum, floor, hands = mains_hum(), background(), handling()
    air, lumps = jet()
    echo = shop(gain_from_db(-13) * tones + gain_from_db(1.0) * motor) + shop(gain_from_db(-0.5) * hands + gain_from_db(-7.0) * air)
    direct = panned(tones + motor, *curves(TOOL_PAN)) + panned(hands, 1.2)
    direct = direct + air + panned(hum, FLOOR_PAN) + pushes()
    quiet = ports(0, floor) * gain_from_db([[FLOOR_PAN / 2], [-FLOOR_PAN / 2]])
    return ports(direct, echo) + quiet + buffeting(lumps)


def low_pass(x):
    return signal.sosfilt(signal.butter(12, 15740, fs=SR, output="sos"), x)


def record(dry):
    ceiling = .95
    share, bass_share = gain_from_db(curves(RIGHT_SHARE)[0]), gain_from_db(curves(RIGHT_BASS)[0])
    left, right = ceiling * np.tanh(dry / ceiling)
    difference = right - left
    bass = filtered(difference, lambda hz: 1 / (1 + (hz / 610) ** 4))
    right = left + bass_share * bass + share * (difference - bass)
    mix = filtered(np.array([left, right]), lambda hz: hz < 15740)
    return low_pass(mix)


dry = scene()
out = record(dry)
to_wav(out)
```